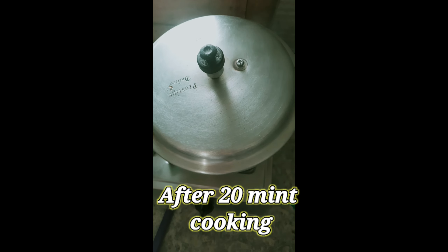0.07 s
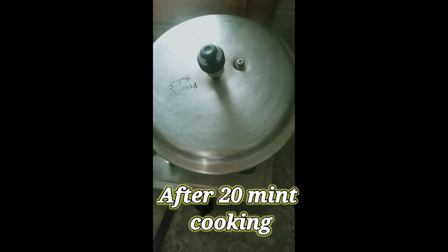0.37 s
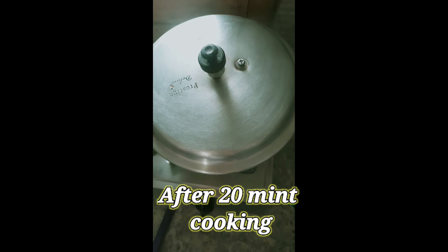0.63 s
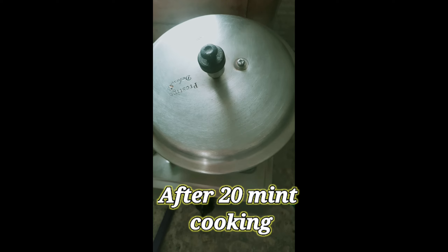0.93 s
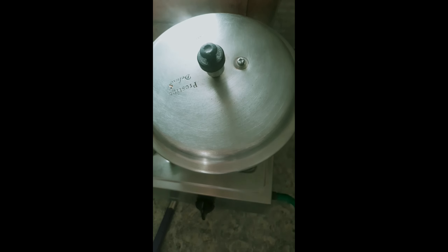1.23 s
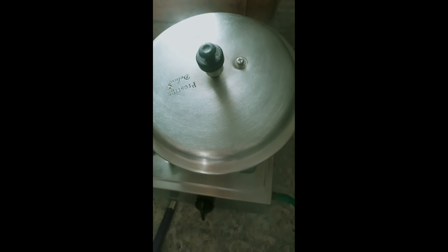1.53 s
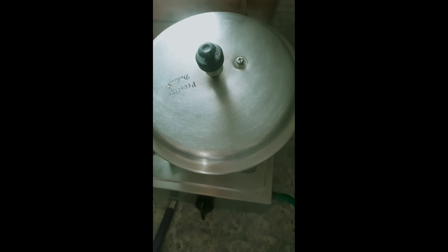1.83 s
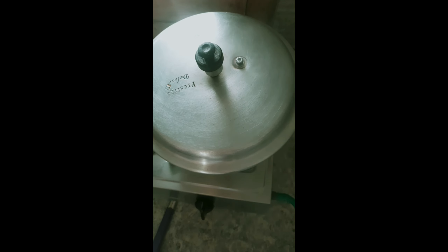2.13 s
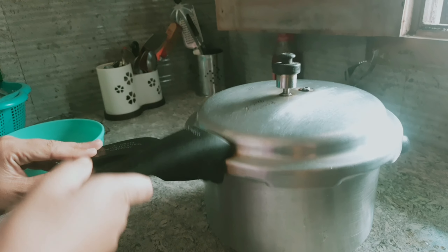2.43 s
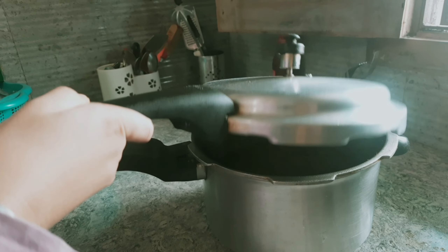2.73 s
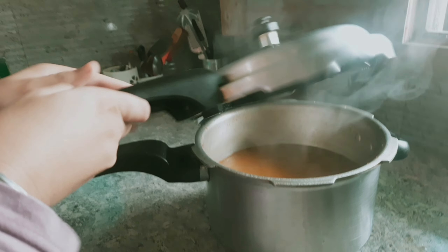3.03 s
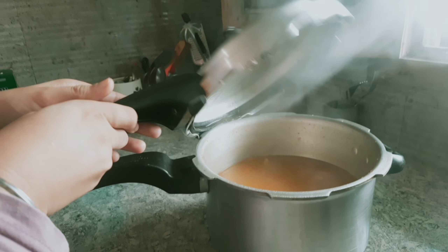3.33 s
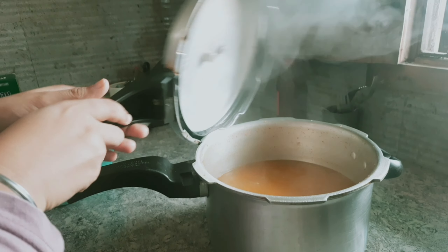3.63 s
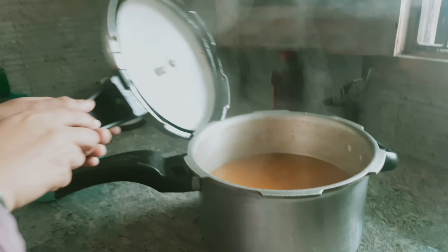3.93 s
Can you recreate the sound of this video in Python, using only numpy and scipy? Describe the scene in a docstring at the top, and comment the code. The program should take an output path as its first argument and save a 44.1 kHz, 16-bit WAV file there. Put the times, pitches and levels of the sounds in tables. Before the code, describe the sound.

Steam hisses from a pressure cooker up close, with soft puffs of air bumping the microphone. After a sudden cut, the lid is slid round and lifted with ringing clanks and light scrapes over a low kitchen hum.

```python
"""A pressure cooker vents a steady jet of steam close to a stereo microphone: a turbulent hiss, coloured
by resonances of valve and lid, while puffs of air thump the right port. The hiss is cut off abruptly.
Then, in a small kitchen with a low hum, the lid is slid round, knocks free of the pot, scrapes over
the rim and is tipped up by its handle. Each touch rings the metal; friction makes the scraping."""
import sys
import numpy as np
from scipy import signal
from scipy.fft import rfft, irfft
from scipy.io import wavfile
from scipy.ndimage import uniform_filter1d

SR = 44100
rng = np.random.default_rng(int(sys.argv[2]) if len(sys.argv) > 2 else 0)


def dump(signal):
    """Clip the signal to [-1, 1] and save it as 16-bit WAV at the path in sys.argv[1]."""
    limited = np.clip(np.atleast_2d(signal).T, -1, 1)
    pcm = np.round(limited * 32767).astype(np.int16)
    wavfile.write(sys.argv[1], SR, pcm)


N = 176400
T, HZ = np.arange(N) / SR, np.maximum(np.arange(N // 2 + 1) * SR / N, 1)
TICK_T60_S = 0.0086


def from_db(db):
    """Decibels to gain."""
    return 10 ** (np.asarray(db) / 20)


def rms_one(x):
    """Scale to rms 1."""
    return x / np.sqrt(np.mean(x ** 2) + 1e-20)


def level(rows):
    """Gain over time from rows of seconds and dB."""
    return from_db(np.interp(T, *np.transpose(rows)))


def dying(t60):
    """Exponential decay from 1, down 60 dB after t60 seconds."""
    return from_db(-60 * T / t60)


def over_hz(rows):
    """Each column of a table, interpolated over log frequency."""
    hz, *columns = np.transpose(rows)
    return np.squeeze([np.interp(np.log(HZ), np.log(hz), c) for c in columns])


def butter(x, kind, hz):
    """Gentle Butterworth filter, 12 dB an octave."""
    return signal.sosfilt(signal.butter(2, hz, kind, fs=SR, output="sos"), x)


def colour(x, db):
    """Causal (minimum-phase) filter with the given gain over frequency."""
    cepstrum = irfft(np.log(from_db(db)), N)
    cepstrum[..., 1:N // 2] *= 2
    cepstrum[..., N // 2 + 1:] = 0
    response = np.atleast_2d(irfft(np.exp(rfft(cepstrum)), N))[:, :N // 20]
    return signal.fftconvolve(np.atleast_2d(x), response, axes=1)[:, :N]


def drift(hz):
    """Random curve of rms 1, moving mostly slower than hz."""
    return rms_one(irfft(rfft(rng.standard_normal(N)) / (1 + (HZ / hz) ** 2), N))


def wander(shape, *spans):
    """Random grid of rms 1, smoothed over the given number of cells along each axis."""
    x = rng.standard_normal(shape)
    for axis, span in enumerate(spans):
        x = uniform_filter1d(x, max(1, round(span)), axis=axis, mode="wrap")
    return rms_one(x)


def clicks(times, db):
    """One impulse per event."""
    out = np.zeros(N)
    out[(times * SR).astype(int)] = from_db(db)
    return out


def ring(times, db, modes, spread_db=1.5):
    """Blows ring damped modes unevenly. Each mode: pitch in Hz, gain in dB, t60 in seconds."""
    out = 0
    for hz, mode_db, t60 in modes:
        radius, angle = from_db(-60 / (t60 * SR)), 2 * np.pi * hz / SR
        blows = clicks(times, db + mode_db + spread_db * rng.standard_normal(len(times)))
        feedback = [1, -2 * radius * np.cos(angle), radius * radius]
        out = out + signal.lfilter([0, np.sin(angle)], feedback, blows + 1e-18)
    return out


def crack(times, db, envelope, trim_db=-6):
    """Dense high ringing of a metal contact, as a burst of coloured noise."""
    # Each row: frequency in Hz, relative level in dB.
    spectrum = [(60, -24), (250, -14), (780, 13), (1150, 5), (1500, 4), (2200, -0.5), (2950, -7.5),
                (3500, -4), (5000, -0.5), (7000, -6.5), (8000, -15.5), (9200, -27), (12000, -31),
                (15000, -41)]
    power = signal.fftconvolve(clicks(times, db) ** 2, envelope ** 2)[:N]
    burst = np.sqrt(np.abs(power)) * rng.standard_normal(N)
    return colour(burst, over_hz(spectrum) + trim_db)


def kitchen_air(alike_below_hz=700):
    """Room tone: low hum and faint hiss, the same on both sides in the bass."""
    # Each row: frequency in Hz, noise density in dB per Hz.
    spectrum = [(25, -111), (45, -92), (66, -62), (95, -80), (135, -79), (190, -83.5), (330, -95),
                (420, -93), (800, -93.5), (1200, -106), (3500, -115), (9000, -123), (15000, -121)]
    mid, side = rfft(rng.standard_normal((2, N)))
    alike = 1 / (1 + (HZ / alike_below_hz) ** 2)
    air = np.sqrt(1 + alike) * mid + np.sqrt(1 - alike) * side * [[1], [-1]]
    return irfft(air * from_db(over_hz(spectrum)), N) * np.sqrt(SR) / 2


def kitchen(direct, t60_s=0.43, delay_s=0.0018):
    """The pot in a small room: direct sound and a short diffuse tail, the treble mostly on the right."""
    # Each row: frequency in Hz, reverberation against direct sound in dB.
    reverberation = [(100, -19.5), (450, -2.5), (1000, 0.5), (1550, -1), (2100, 4), (5000, -5.5),
                     (8000, -6.5), (12000, 2)]
    # Each row: frequency in Hz, left minus right in dB.
    pan = [(200, -1), (450, 3), (1300, -2.5), (2500, -3.5), (4400, -12), (7500, -20), (9500, -1),
           (15000, 4)]
    tail = rng.standard_normal((2, N)) * dying(t60_s) * (T > delay_s)
    tail /= np.sqrt(np.sum(tail ** 2, axis=1, keepdims=True))
    wet = colour(signal.fftconvolve(direct, tail, axes=1)[:, :N], over_hz(reverberation))
    return colour(direct + wet, over_hz(pan) * [[.5], [-.5]])


def pings(t60_s=0.29):
    """Loose metal rings on in faint single tones."""
    # Each row: start in seconds, level in dB, pitch in Hz.
    touches = [(2.605, -65, 2799), (3.578, -67, 2750)]
    return sum(ring(np.array([s]), db, [(hz, 0, t60_s)]) for s, db, hz in touches)


def rumble():
    """The handled pot rumbles on the counter."""
    # Each row: time in seconds, level in dB.
    handling = [(2.4, -53), (2.56, -42), (2.68, -58), (2.85, -46), (3.15, -50.5), (3.28, -54.5),
                (3.47, -53.5), (3.56, -47), (3.68, -52.5), (3.77, -48.5), (3.88, -47), (4, -49.5)]
    # Each row: frequency in Hz, relative level in dB.
    spectrum = [(20, -38), (42, -28.5), (75, 2.5), (125, -7), (195, 1.5), (245, -10), (320, -4),
                (430, -20.5), (900, -30.5), (2500, -57)]
    return rms_one(colour(rng.standard_normal(N), over_hz(spectrum))) * level(handling)


def rubbing(slips_per_s=3000, trim_db=0.5):
    """Friction of lid and hands: dense small slips of metal and gasket."""
    # Each row: time in seconds, relative level in dB.
    strokes = [(2.425, -78), (2.465, -58.5), (2.57, -59), (2.67, -78), (2.99, -76), (3.035, -47.5),
               (3.11, -51), (3.19, -78), (3.36, -76), (3.46, -65.5), (3.56, -61), (3.66, -68),
               (3.75, -59.5), (3.82, -67), (3.9, -60.5), (4, -77)]
    # Each row: frequency in Hz, relative level in dB.
    spectrum = [(150, 12), (500, 15.5), (1100, 4.5), (1600, 1.5), (3000, -4), (5300, 0.5), (7300, -6),
                (9200, -19), (15000, -27)]
    slips = (rng.random(N) < slips_per_s / SR) * rng.standard_normal(N)
    return rms_one(colour(slips, over_hz(spectrum))) * level(strokes) * from_db(trim_db)


def unlock(start_s=2.586):
    """The lid's lugs leave their lock with one short, hollow click."""
    # Each row: pitch in Hz, gain in dB, t60 in seconds.
    lug_modes = [(1495, -1.5, 0.03), (1560, -11, .025), (1850, -17, .03), (3600, -15, .03)]
    start = np.array([start_s])
    return ring(start, db=-40, modes=lug_modes) + crack(start, db=-44, envelope=dying(TICK_T60_S))


def handle_shifts():
    """The handle and the loose valve weight shift: soft thuds with a small clink and a thin tick."""
    # Each row: start in seconds, then strength of thud, clink and tick in dB.
    shifts = [(2.532, -46, -50, -62), (3.343, -62, -77, -36), (3.4991, -34.5, -38, -29),
              (3.531, -38, -60, -62), (3.752, -41.5, -48, -58), (3.845, -40.5, -49, -62)]
    # Each row of both: pitch in Hz, gain in dB, t60 in seconds.
    thud_modes = [(112.36, -3.5, 0.8), (187, -1, 0.18), (305, -5.5, 0.048), (486, -5.5, 0.044)]
    clink_modes = [(714, -13, 0.026), (1070, -13, 0.039), (1530, -7, 0.032), (1920, -15, 0.03)]
    starts, thud_db, clink_db, tick_db = np.transpose(shifts)
    tick = butter(crack(starts, tick_db, dying(TICK_T60_S)), "high", hz=4800)
    return ring(starts, thud_db, thud_modes) + ring(starts, clink_db, clink_modes) + tick


def lid_knocks():
    """The lid knocks on the pot, ringing body and rim; the low ring rises as the gap opens."""
    # Each row: start in seconds, strength at body and at rim in dB, the body's pitch ratio,
    # factor on its ring time as the grip tightens or loosens.
    knocks = [(2.7635, -21, -35.5, 0.98, 1.15), (2.7764, -24, -39, 1, .9), (2.7867, -24, -32.5, 0.99, 1.1),
              (2.8196, -12, -21.5, 1.04, 0.33), (2.8343, -28.5, -42, 1.02, 1.6),
              (3.025, -32.5, -38, 1.08, 0.92), (3.034, -24.5, -35, 1.07, 1.1),
              (3.042, -28, -30.5, 1.05, 1.2), (3.051, -26, -28.5, 1.12, 1), (3.0584, -21, -31, 1.07, 0.74),
              (3.090, -34, -29, 1.03, 0.66), (3.096, -52, -30.5, 1.07, 0.87), (3.102, -50, -30, 1.15, 1)]
    # Low modes of pot and lid. Each row: base pitch in Hz, gain in dB, base t60 in seconds.
    body_modes = [(182.6, -7.5, 0.29), (418, -21, 0.16), (464.4, -4, 0.1), (614, -25.5, 0.096),
                  (788, -28, 0.16)]
    # Bright modes of the rim. Each row: pitch in Hz, gain in dB, t60 in seconds.
    rim_modes = [(868, -18.5, 0.12), (1387, -22, 0.12), (1507, -24, 0.094), (1935, -23.5, 0.14),
                 (2106, -34, 0.088), (2206, -32, .1), (2654, -31.5, 0.11), (3460, -26.5, 0.08),
                 (4820, -29, 0.06), (5200, -36, .08), (5640, -34, 0.09)]
    body = sum(ring(np.array([s]), db, np.array(body_modes) * [ratio, 1, grip])
               for s, db, _, ratio, grip in knocks)
    cushioned = butter(body, "band", hz=[276, 900])   # the band a touch drives through the gasket
    starts, _, rim_db, _, _ = np.transpose(knocks)
    sizzle = dying(0.023) + from_db(-22) * dying(0.18)   # a sharp crack, then faint chatter
    return cushioned + ring(starts, rim_db, rim_modes) + crack(starts, rim_db, sizzle)


def puffs(decay_s=0.0021, trim_db=5):
    """Short pushes of air thump the microphone's right port."""
    # Each row: start in seconds, relative level in dB.
    gusts = [(0.086, -22), (0.128, -25), (.153, -23), (0.445, -26.5), (0.756, -24.5), (.841, -20.5),
             (0.918, -19.5), (0.986, -26.5), (1.3431, -14), (1.588, -16), (1.657, -28.5), (2.008, -22),
             (2.077, -21.5)]
    starts, db = np.transpose(gusts)
    push = signal.lfilter([1], [1, -np.exp(-1 / (decay_s * SR))], clicks(starts, db + trim_db) + 1e-18)
    return butter(push, "band", hz=[62.6, 486]) * [[0], [1]]


def resonate(jet, size=2048):
    """Resonances of valve and lid swell and wander; a faint random shimmer is laid over the treble."""
    # Each row: mean centre in Hz, width in Hz, mean boost in dB.
    resonances = [(3480, 45, 4), (3565, 45, 3), (3676, 45, 5), (4633, 32, 3.5), (5065, 35, 3.5),
                  (5245, 40, 3), (5345, 45, 3.5), (5908, 60, 3.5), (7168, 30, 4), (7285, 45, 4),
                  (7535, 35, 4.5), (7675, 55, 3), (7763, 45, 5), (11690, 30, 4), (11985, 30, 4.5),
                  (12353, 50, 3), (13858, 30, 4)]
    shimmer_db, shimmer_width_hz, shimmer_rate_hz, full_above_hz = 2, 90, 14, 2000
    pitch_spread, boost_spread, drift_hz = 0.0005, 0.25, 4
    hz, s, frames = signal.stft(jet, SR, nperseg=size, noverlap=size * 3 // 4)
    shimmer = wander(frames.shape[1:], shimmer_width_hz / hz[1], 1 / (shimmer_rate_hz * s[1]))
    db = shimmer_db * shimmer * np.minimum(hz[:, None] / full_above_hz, 1) ** 2
    for centre, width, boost_db in resonances:
        bend, swell = wander((2, len(s)), 1, 1 / (drift_hz * s[1]))
        off_hz = hz[:, None] - centre * (1 + pitch_spread * bend)
        db = db + boost_db * (1 + boost_spread * swell) / (1 + (2 * off_hz / width) ** 2)
    return signal.istft(frames * from_db(db), SR, nperseg=size, noverlap=size * 3 // 4)[1][:, :N]


def steam(trim_db=-1.22, echo_db=-15.5, echo_t60_s=0.25, flutter_db=0.36):
    """Turbulent jet at close range, partly out of phase at the two ports, combed by near reflections."""
    # Each row: frequency in Hz, relative level at the left and at the right port in dB.
    spectrum = [(100, -79.5, -67.5), (400, -83, -67.5), (836, -74, -69.5), (1350, -70, -67.5),
                (1750, -61.5, -61.5), (2220, -60.5, -60.5), (2664, -55.5, -54.5), (3350, -54.5, -58.5),
                (3570, -56, -59.5), (3870, -54.5, -54.5), (4340, -59, -56), (5066, -59, -55),
                (5840, -60, -56.5), (6470, -64, -55), (6900, -63.5, -59.5), (7240, -63, -52.5),
                (7910, -67.5, -51.5), (8000, -64.5, -55), (8900, -59.5, -56.5), (9400, -60.5, -62.5),
                (10000, -59, -58.5), (10820, -57, -57.5), (12200, -55.5, -57), (13400, -57, -58.5),
                (15300, -57.3, -58.5)]
    # How alike the ports hear the jet. Each row: frequency in Hz, likeness in phase and likeness
    # a quarter cycle apart, both -1 to 1, the latter positive when the right leads.
    likeness = [(440, 0.057, 0), (905, 0.26, -.25), (1150, 0.27, -.45), (1560, 0.11, -.45),
                (1860, 0, -0.39), (2230, -0.59, 0.086), (2680, -0.32, -.1), (2967, -0.98, 0.04),
                (3260, -.05, 0.35), (3590, .2, -0.43), (4090, -.65, -0.27), (4550, -.05, .1),
                (4900, -.3, .4), (5600, .1, 0.39), (6150, .1, 0.12), (7650, -.1, -0.28), (8600, .2, 0.33),
                (9980, .05, -.2), (11100, -0.083, 0.063), (11900, .42, 0), (12800, 0, 0.23),
                (14200, .15, .2), (15180, -.1, -.05)]
    in_phase, quarter = over_hz(likeness)
    alike = in_phase + 1j * quarter
    left, unrelated = rfft(rng.standard_normal((2, N)))
    right = alike * left + np.sqrt(np.clip(1 - np.abs(alike) ** 2, 0, 1)) * unrelated
    echoes = rng.standard_normal(N) * (T > 0) * dying(echo_t60_s)   # off lid and walls
    echoes *= from_db(echo_db) / np.sqrt(np.sum(echoes ** 2))
    combed = np.array([left, right]) * (1 + rfft(echoes))
    jet = irfft(combed * from_db(over_hz(spectrum) + trim_db), N) * np.sqrt(SR / 2)
    return resonate(jet) * from_db(flutter_db * drift(hz=19))


def scene():
    """The venting close up, a short silence, then the pot is opened in the kitchen."""
    cut_s, fade_out_s, resume_s, fade_in_s = 2.222, 0.046, 2.299, 0.19
    venting = np.sqrt(np.clip((cut_s - T) / fade_out_s, 0, 1))
    opening = np.clip((T - resume_s) / fade_in_s, 0, 1) ** 2
    pot = unlock() + lid_knocks() + handle_shifts() + pings() + rubbing() + rumble()
    return venting * (steam() + puffs()) + opening * (kitchen(pot) + kitchen_air())


def record(dry, bass_hz=38.3, top_hz=15560):
    """The microphone loses the deepest bass; the top is cut steeply."""
    top_cut = signal.firwin(801, top_hz, fs=SR, window=("kaiser", 8))
    return signal.fftconvolve(butter(dry, "high", bass_hz), top_cut[None], "same", axes=1)


dry = scene()
out = record(dry)
dump(out)
```